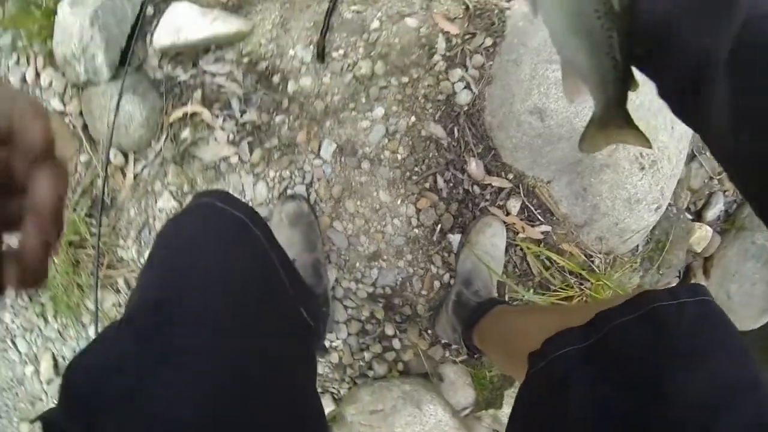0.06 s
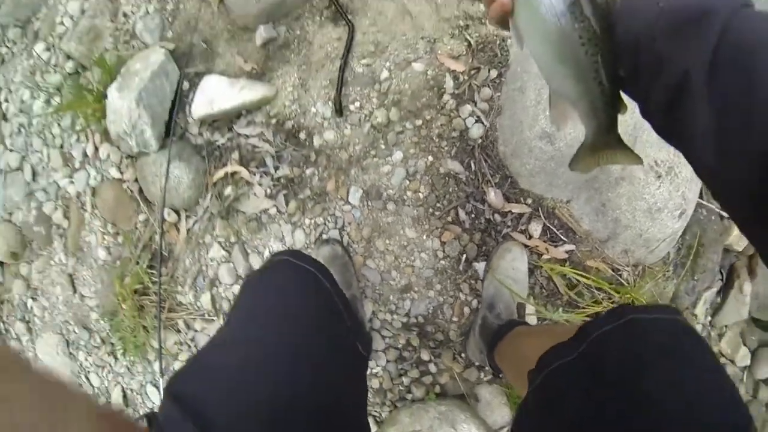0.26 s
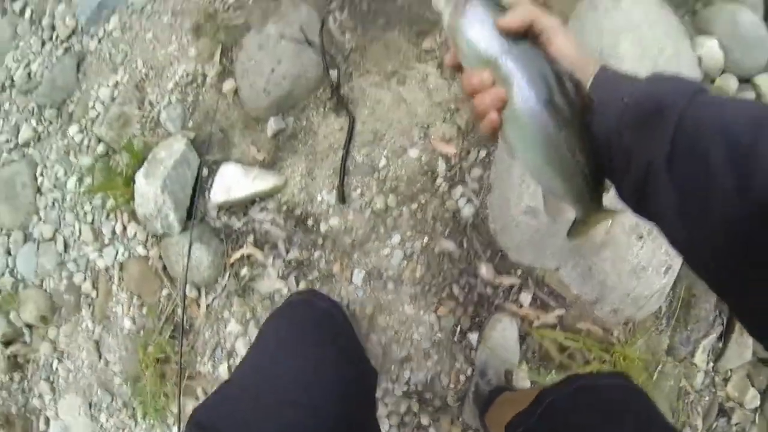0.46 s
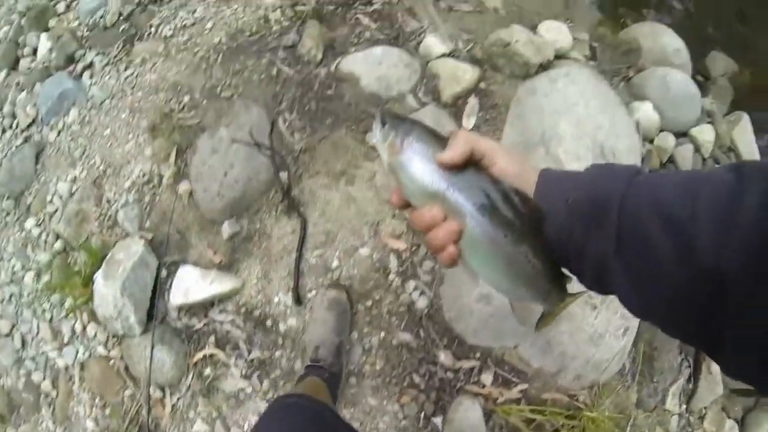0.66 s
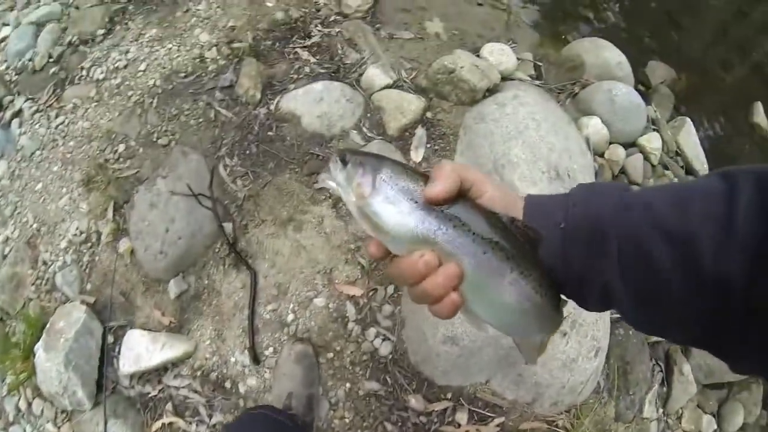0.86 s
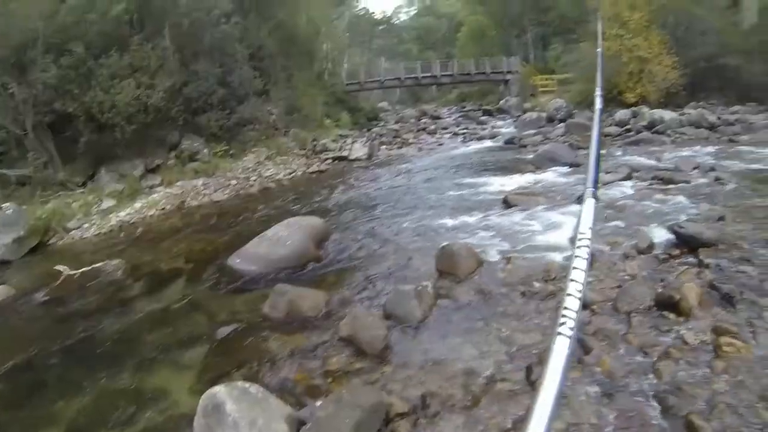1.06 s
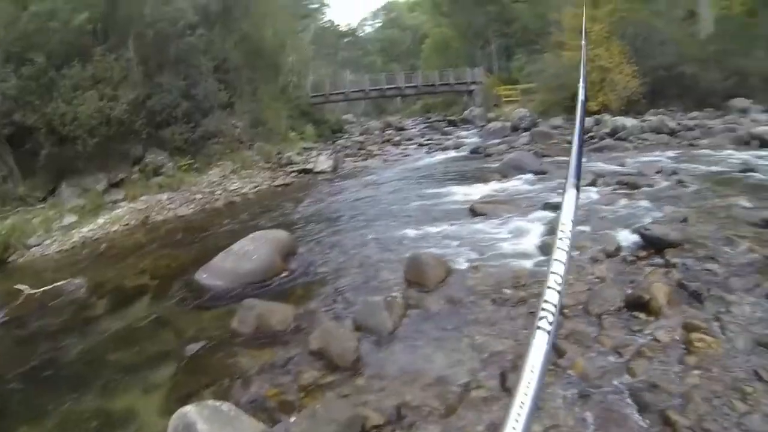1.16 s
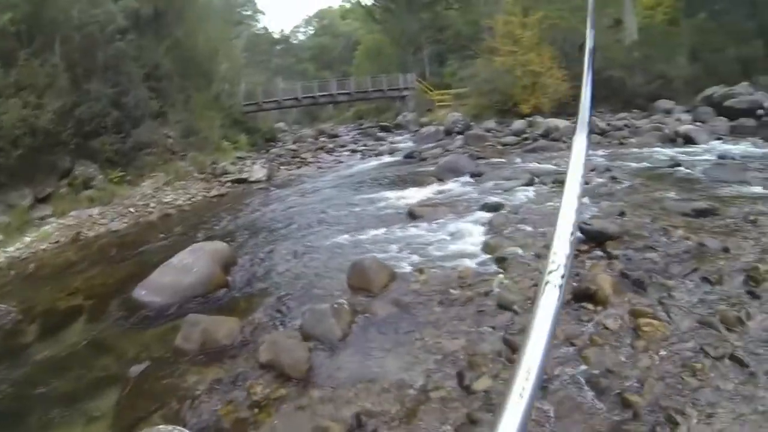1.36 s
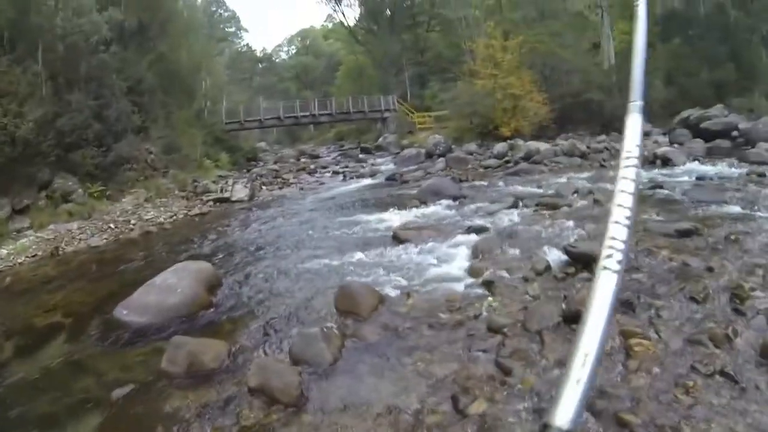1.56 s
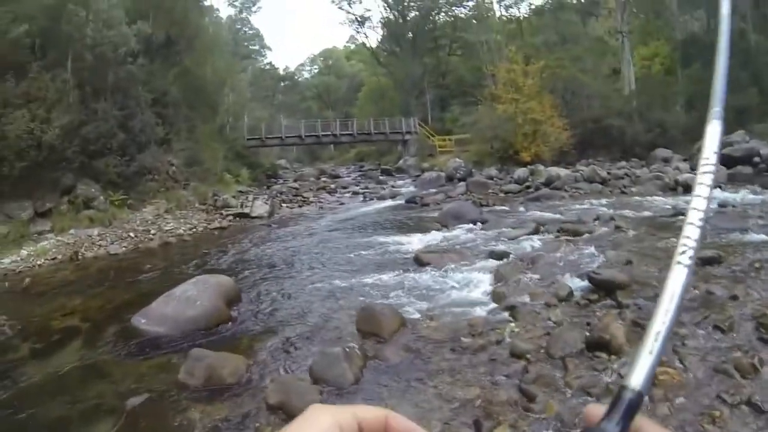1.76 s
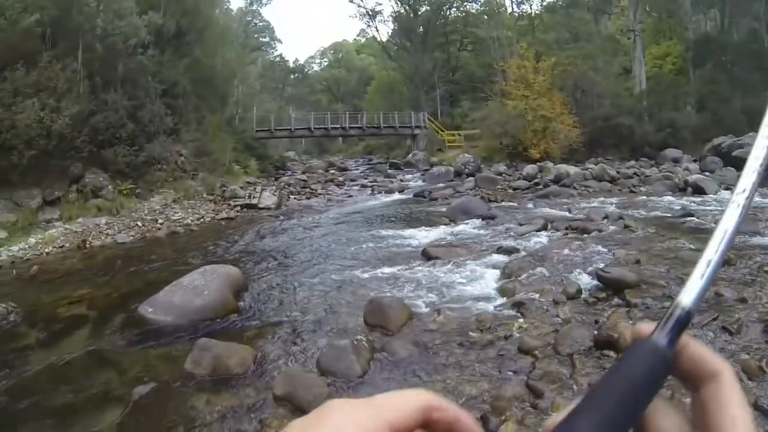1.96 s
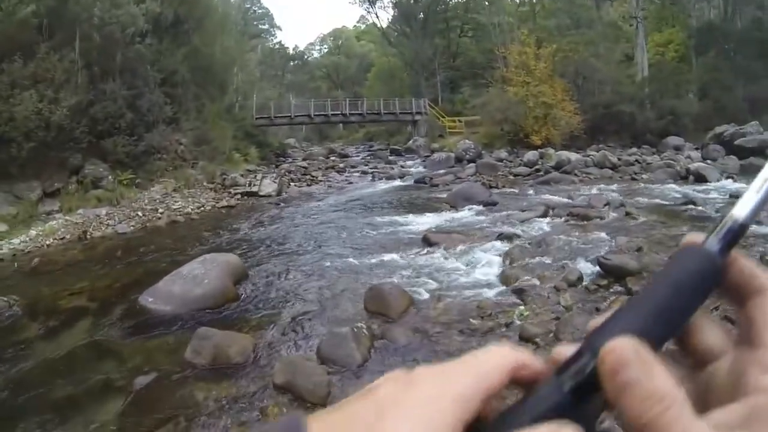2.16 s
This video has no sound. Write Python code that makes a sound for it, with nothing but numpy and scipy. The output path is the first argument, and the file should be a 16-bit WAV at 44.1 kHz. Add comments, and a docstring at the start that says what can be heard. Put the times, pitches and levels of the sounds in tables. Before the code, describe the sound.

After a nearly quiet start with faint water, close handling noise bursts in, scraping, cracking and thudding on a body-worn camera's case, then a click and an even rush of stony rapids at lower level outdoors.

```python
"""Beside a shallow, stony river: a body-worn camera in a plastic housing, first on the bank, then at the
rapids. Something rubs over the housing (uneven friction noise), which creaks and knocks (short ringing
modes with a crack) and thumps (low fading tones), while the movement makes it rumble (deep noise).
After a few dry ticks and a sharp click the scene cuts to the water's edge, where the rapids rush
steadily (coloured noise and small rising bubbles), coloured by the housing's resonance."""
import sys
import numpy as np
from scipy import signal
from scipy.fft import rfft, irfft
from scipy.io import wavfile
from scipy.ndimage import uniform_filter1d

SR = 44100
rng = np.random.default_rng(int(sys.argv[2]) if len(sys.argv) > 2 else 0)


def master_out(mix):
    """Clip the mix to full scale and print it as 16-bit PCM to the path in sys.argv[1]."""
    frames = np.transpose(np.atleast_2d(mix))
    ceiling = np.clip(frames, -1, 1)
    pcm = np.round(ceiling * 32767).astype(np.int16)
    wavfile.write(sys.argv[1], SR, pcm)


N = 97020  # length in samples: 2.2 s

# All colours give the balance of pitches only; loudness is set separately.
# colour of the river from the bank, and of the rapids up close: f/Hz, level/dB
BANK_COLOUR = [(59, -29), (100, -5.5), (197, -14), (244, -17.5), (295, -22), (365, -24), (389, -31),
               (513, -26), (1010, -31.5), (1450, -20), (2040, -31), (2990, -31), (4570, -40.5), (7450, -43),
               (9410, -52.5), (11400, -43.5), (16000, -65)]
RAPIDS_COLOUR = [(59, -31), (100, -6.5), (138, -7.5), (174, -6), (277, -8), (442, -9.5), (608, -12.5),
                 (768, -4.5), (872, -13.5), (950, -15), (1130, -11.5), (1250, -3), (1610, -0.5),
                 (1870, -10), (2080, -9), (2320, -18), (2990, -12.5), (3250, -16), (3780, -16.5),
                 (4200, -21.5), (5420, -20), (9020, -33.5), (13800, -36), (14700, -44), (16000, -74)]
# loudness of the river heard from the bank: t/s, level/dB
BANK_LEVEL = [(0, -53), (.33, -53), (.85, -60), (.96, -57)]
# single splashes in the rapids: t/s, level/dB, centre f/Hz
SPLASHES = [(1.329, -54, 5100), (1.803, -53, 4930)]
# rumble of the moving camera: t/s, level/dB; its colour: f/Hz, level/dB
SWAY_LEVEL = [(0, -33.5), (.08, -33), (.32, -28), (.39, -16), (.47, -16.5), (.62, -15), (.70, -21),
              (.83, -16), (.90, -22), (.955, -16), (.965, -38.5), (1.5, -35.5), (1.95, -42.5), (2.2, -33)]
SWAY_COLOUR = [(5, -10.5), (13, 11), (25, -10.5), (45, -20.5), (80, -29), (160, -51.5), (320, -66),
               (700, -98), (2000, -125)]
# dull thumps: t/s, level/dB, f/Hz, time to fade by 60 dB/s
THUMPS = [(.245, -40.5, 168, 0.045), (0.3555, -25.5, 129, 0.059), (.392, -12, 37, 0.27),
          (.396, -19.5, 186, 0.066), (0.451, -11, 110, 0.014), (0.5, -19.5, 153, .03),
          (.530, -17.5, 108, 0.082), (.617, -8, 46, 0.11), (.742, -21, 128, 0.077), (0.775, -20, 247, 0.03),
          (0.8284, -7, 103, 0.025), (0.8301, -8.5, 363, .014), (0.944, -6, 35, 0.055),
          (1.164, -34.5, 131, 0.02), (1.327, -39.5, 162, 0.055), (1.89, -41.5, 68.4, 0.11)]
# handling noise carried through the housing: t/s, level/dB; its colour: f/Hz, level/dB
HANDLING_LEVEL = [(.34, -79), (.36, -49), (.40, -44), (.44, -40), (.52, -33), (.62, -29.5), (.68, -38),
                  (.76, -25), (.82, -32), (.86, -36), (.90, -46), (.96, -67)]
HANDLING_COLOUR = [(20, -13.5), (55, 5), (100, -3), (200, -10), (400, -22.5), (750, -23.5), (1100, -36),
                   (3000, -72)]
# bright scrape over the housing: t/s, level/dB; its colour: f/Hz, level/dB
SCRAPE_LEVEL = [(.354, -78.5), (.358, -38.5), (.365, -33), (.385, -40), (.402, -38), (.455, -45),
                (.485, -59), (.53, -48), (.56, -77)]
SCRAPE_COLOUR = [(290, -54), (500, -31), (718, -11.5), (919, -12), (1180, -15), (1320, -11), (1640, 3),
                 (2040, -6), (2500, -10), (2730, -4), (3200, -5), (3860, -12), (4400, -11), (4800, -18),
                 (5630, -5.5), (6230, -20.5), (8330, -16), (9220, -27), (11300, -21), (12100, -41),
                 (14000, -32), (15300, -56), (16000, -78)]
# duller rubbing between the knocks: t/s, level/dB; its colour: f/Hz, level/dB
RUB_LEVEL = [(.37, -84), (.40, -42), (.44, -43.5), (.46, -38), (.485, -49), (.505, -44), (.535, -40),
             (.556, -46), (.568, -41), (.585, -45.5), (.605, -36.5), (.622, -37), (.635, -47), (.675, -55),
             (.73, -52), (.77, -44), (.788, -47), (.85, -65), (.90, -84)]
RUB_COLOUR = [(290, -32), (500, -20), (586, -35), (740, -27), (1060, -18), (1690, -3.5), (2570, -20),
              (3150, -16.5), (4030, -27.5), (4870, -29), (5630, -26), (6230, -34), (7000, -32.5),
              (9220, -42), (11500, -45), (13800, -55), (16000, -76)]
# knocks and creaks of the housing: t/s, level/dB, centre of the contact's spectrum f/Hz
KNOCKS = [(.3932, -31, 1800), (.3992, -19.5, 1600), (.4505, -18, 1500), (.4981, -11, 1350),
          (.5733, -18.5, 2600), (.5943, -14, 2560), (.6096, -14, 2440), (.6178, -26, 1500),
          (.6408, -27, 1620), (.6775, -34, 1900), (.6897, -27, 1700), (.6971, -17, 1630),
          (.7142, -30.5, 1850), (.7360, -16.5, 1690), (.7388, -9.5, 1730), (.7400, -17, 1690),
          (.7590, -20, 1880), (.7612, -13, 1850), (.7635, -8.5, 1850), (.7648, -16.5, 1800),
          (.7765, -22, 1680), (.7930, -19, 1650), (.8318, -41.5, 2600), (.8395, -45, 2810),
          (.8655, -38.5, 1690)]
# modes (natural tones) of the housing: f/Hz, relative level/dB, time to fade by 60 dB/s
HOUSING_MODES = [(818, 3.5, 0.022), (1155, -6.5, 0.015), (1330, 2, 0.011), (1575, 4.5, 0.016),
                 (1703, -3.5, 0.016), (2250, -4.5, 0.015), (2745, -2.5, 0.011), (3250, -12, 0.0067),
                 (4460, -4, 0.0095), (5280, -1, 0.017), (6510, -0.5, 0.0081), (7650, -6, .005),
                 (11100, -30, 0.0036)]
# colour of the crack in each knock: f/Hz, level/dB
CRACK_COLOUR = [(250, -15), (700, 2.5), (1100, -7), (1650, 6.5), (2900, -7.5), (4100, -25), (5500, -16.5),
                (7200, -19.5), (9500, -41), (13000, -37), (16000, -60)]
# runs of faint dry ticks: start t/s, end t/s, ticks per second, typical level/dB before dulling
TICKS = [(.784, 0.82, 215, -30), (0.868, 0.872, 300, -38), (0.937, .946, 69, -34), (.952, 0.955, 1130, -37)]

CUT_S = 0.962  # when the bank gives way to the rapids
RAPIDS_DB, RAPIDS_DRIFT_DB_PER_S = -47.5, -0.15
FLICKER_DB, FLICKER_HZ = 0, 38  # a depth of 0 keeps the rush even
BUBBLES_PER_S, BUBBLE_CYCLES, BUBBLE_SPREAD_DB, BUBBLE_DB = 1200, 7.3, 2.0, -11.5
GURGLE_DB, GURGLE_HZ = 1.5, 7.4  # depth and speed of the swelling
SPLASH_S = 0.0054  # fade time constant
THUMP_ATTACK_S = 0.00059
GRAIN_DB, GRAIN_HZ = 2.5, 450  # depth and speed of the unevenness in the friction
CONTACT_S = 0.0002  # onset time constant of a knock
CONTACT_DB_PER_OCTAVE = 17  # how much weaker a mode rings away from the contact's centre
CRACK_DB, CRACK_S, TAIL_DB, TAIL_S = -6.5, 0.0019, -36.5, 0.0028  # a main fade and a weak tail
CRACK_BRIGHT_DB_PER_OCTAVE, USUAL_CENTRE_HZ = 27.5, 1730
TICK_S, TICK_DULL_HZ = 0.0052, 8600
CUT_CLICK_DB, CUT_CLICK_S = -13.5, 0.0026
TOP_HZ = 15800


def undb(db):
    """Turn decibels into a gain."""
    return 10 ** (np.asarray(db) / 20)


def unit(x):
    """Scale to an rms (average strength) of 1."""
    return x / np.sqrt(np.mean(x ** 2) + 1e-18)


def times():
    """Time of every sample, in seconds."""
    return np.arange(N) / SR


def frequencies():
    """Frequency of every spectrum bin, in Hz."""
    return np.arange(N // 2 + 1) * SR / N


def curve(rows):
    """Gain over time, by straight lines in dB between the rows."""
    return undb(np.interp(times(), *np.array(rows).T))


def colour(x, points):
    """Shape the spectrum of a sound by points of frequency and level, then scale to rms 1."""
    hz, db = np.array(points).T
    place = np.log(np.maximum(frequencies(), 1))
    gain = undb(np.interp(place, np.log(np.maximum(hz, 1)), db))
    return unit(irfft(rfft(x) * gain, N))


def noise(points):
    """Steady coloured noise."""
    return colour(rng.standard_normal(N), points)


def walk(rate):
    """Smooth random motion of spread 1, mostly slower than the rate in Hz."""
    spectrum = rfft(rng.standard_normal(N))
    return unit(irfft(spectrum / (1 + (frequencies() / rate) ** 4), N))


def lowpass(x, hz):
    """Gently dull a sound above a frequency."""
    return signal.sosfilt(signal.butter(1, min(hz, SR / 2 - 1), fs=SR, output="sos"), x)


def add(out, start, sound):
    """Mix a sound in at its time."""
    i = int(np.clip(start * SR, 0, N - 1))
    out[i:i + len(sound)] += sound[:N - i]


def ring(t, hz, t60):
    """One tone that fades by 60 dB in t60 seconds."""
    return np.sin(2 * np.pi * hz * t) * np.exp(-np.log(1000) * t / t60)


def water(spectrum, low_hz=400, high_hz=5000, glide=0.14):
    """White water: rushing noise full of small bubbles, each a short fading tone rising in pitch."""
    bubbles = np.zeros(N)
    rush = rng.standard_normal(N) * undb(FLICKER_DB * walk(FLICKER_HZ))
    draws = rng.random((5000, 3))  # more than enough bubbles
    for when, pitch, size in draws[:int(BUBBLES_PER_S * N / SR)]:
        hz = low_hz + (high_hz - low_hz) * pitch ** 2  # low bubbles are commoner
        life = 2 * BUBBLE_CYCLES / hz
        t = np.arange(int(life * SR)) / SR
        # half the glide in the phase makes the pitch rise by the whole glide
        tone = ring(t, hz * (1 + glide * t / life / 2), life)
        strength = np.sqrt(hz) * undb(-BUBBLE_SPREAD_DB * np.log(1 - size))
        add(bubbles, when * N / SR, tone * strength)
    return colour(rush + undb(BUBBLE_DB) * unit(bubbles), spectrum)


def gurgle(x, count=8):
    """Split a sound into overlapping bands and let each swell and sink on its own."""
    place = np.log(np.maximum(frequencies(), 1))
    centres = np.linspace(np.log(400), np.log(6000), count)
    spectrum = rfft(x)
    out = np.zeros(N)
    for band in np.eye(count):
        part = irfft(spectrum * np.interp(place, centres, band), N)
        out += part * undb(GURGLE_DB * walk(GURGLE_HZ))
    return out


def river():
    """Faint water from the bank, fuller after the cut to the rapids, with the odd splash of noise."""
    t = times()
    middle = (CUT_S + N / SR) / 2  # of the time at the rapids
    rapids = gurgle(water(RAPIDS_COLOUR)) * undb(RAPIDS_DB + RAPIDS_DRIFT_DB_PER_S * (t - middle))
    for start, db, hz in SPLASHES:
        splash = noise([(hz / 2, -50), (hz, 0), (hz * 2, -50)])
        add(rapids, start, splash * undb(db) * np.exp(-t / SPLASH_S))
    bank = water(BANK_COLOUR) * curve(BANK_LEVEL)
    return np.where(t < CUT_S, bank, rapids)


def sway():
    """Deep rumble from the camera's movement: noise evened out, then made to follow its level curve."""
    rumble = noise(SWAY_COLOUR)
    window = SR // 10
    power = uniform_filter1d(uniform_filter1d(rumble ** 2, window), window)
    return rumble / np.sqrt(power) * curve(SWAY_LEVEL)


def thumps():
    """Soft bumps against the camera and its mount, each one fading tone with a softened start."""
    out, t = np.zeros(N), np.arange(SR // 5) / SR
    onset = 1 - np.exp(-t / THUMP_ATTACK_S)
    for start, db, hz, t60 in THUMPS:
        add(out, start, undb(db) * ring(t, hz, t60) * onset)
    return out


def grainy(spectrum):
    """Friction noise that catches and slips: its strength changes quickly and unevenly."""
    return colour(rng.standard_normal(N) * undb(GRAIN_DB * walk(GRAIN_HZ)), spectrum)


def rubbing():
    """A bright scrape, then duller rubbing, over the low noise of handling; all stop at the cut."""
    scrape = grainy(SCRAPE_COLOUR) * curve(SCRAPE_LEVEL)
    rub = grainy(RUB_COLOUR) * curve(RUB_LEVEL)
    handling = noise(HANDLING_COLOUR) * curve(HANDLING_LEVEL)
    return (scrape + rub + handling) * (times() < CUT_S)


def knocks():
    """Each slip rings the housing's modes, most those near its centre; a higher centre brightens its crack."""
    out, t = np.zeros(N), np.arange(SR // 20) / SR
    grit = noise(CRACK_COLOUR)
    dull = lowpass(grit, USUAL_CENTRE_HZ)
    onset = 1 - np.exp(-t / CONTACT_S)
    fade = undb(CRACK_DB) * np.exp(-t / CRACK_S) + undb(TAIL_DB) * np.exp(-t / TAIL_S)
    for k, (start, db, centre) in enumerate(KNOCKS):
        body = np.zeros(len(t))
        for hz, mode_db, t60 in HOUSING_MODES:
            octaves_away = abs(np.log2(hz / centre))
            body += undb(mode_db - CONTACT_DB_PER_OCTAVE * octaves_away) * ring(t, hz, t60)
        body /= np.abs(body * onset).max()
        octaves_up = min(np.log2(centre / USUAL_CENTRE_HZ), 0.2)
        treble = undb(CRACK_BRIGHT_DB_PER_OCTAVE * octaves_up)
        part = slice(k * len(t), (k + 1) * len(t))  # fresh noise for every knock
        crack = (dull[part] + treble * (grit[part] - dull[part])) * fade
        add(out, start, undb(db) * (body + crack) * onset)
    return out


def ticks(jitter=0.12, scatter_db=7.5):
    """Runs of tiny dry ticks, then the sharp click of the cut; each is a sudden jump that fades away."""
    out, t = np.zeros(N), np.arange(SR // 10) / SR
    for start, end, rate, db in TICKS:
        draws = rng.standard_normal((20, 2))  # more than enough ticks
        count = int((end - start) * rate) + 1
        for k, (late, size) in enumerate(draws[:count]):
            when = start + (k + jitter * late) / rate
            add(out, when, undb(db + scatter_db * size) * np.exp(-t / TICK_S))
    out = lowpass(lowpass(out, TICK_DULL_HZ), TICK_DULL_HZ)
    add(out, CUT_S, undb(CUT_CLICK_DB) * np.exp(-t / CUT_CLICK_S))  # the click stays sharp
    return out


def scene():
    """Mix all sounds into one channel."""
    return (river() + knocks() + thumps() + rubbing() + ticks() + sway())[None]


def record(dry):
    """Cut the top of the treble with a steep filter."""
    return signal.sosfilt(signal.ellip(8, 0.2, 80, TOP_HZ, fs=SR, output="sos"), dry)


dry = scene()
out = record(dry)
master_out(out)
```